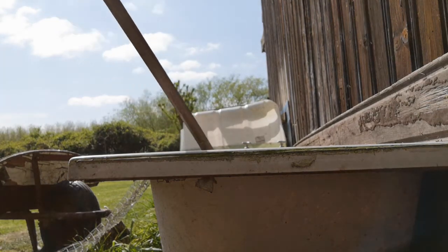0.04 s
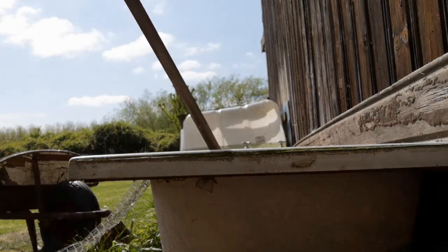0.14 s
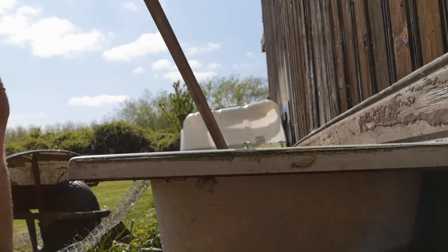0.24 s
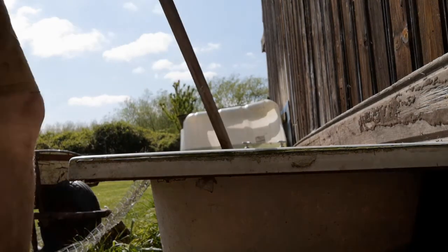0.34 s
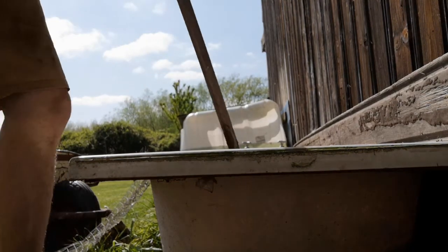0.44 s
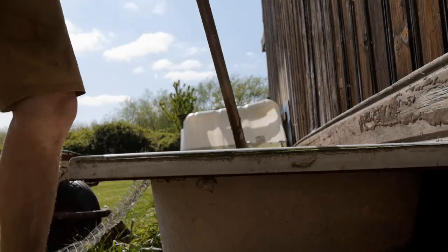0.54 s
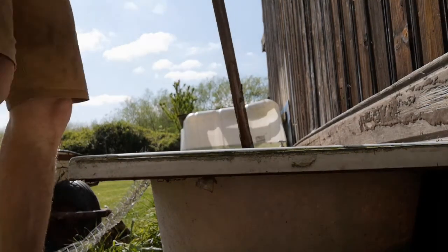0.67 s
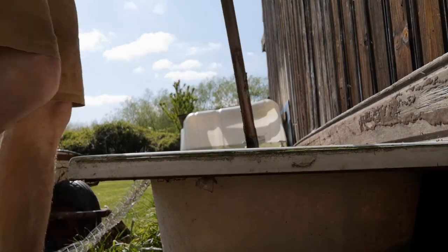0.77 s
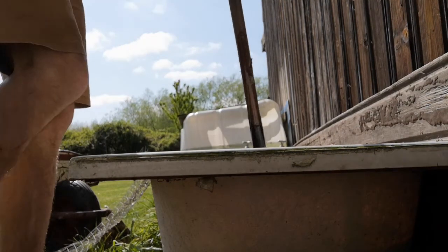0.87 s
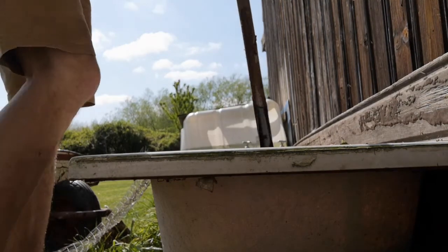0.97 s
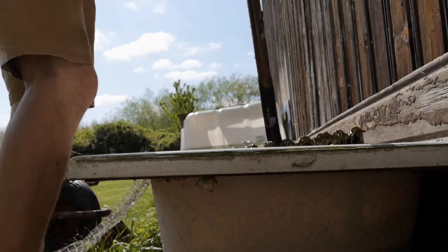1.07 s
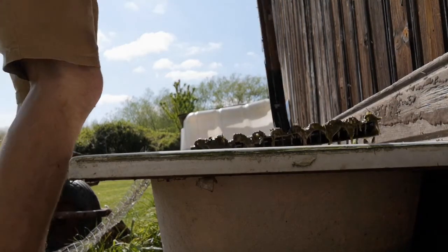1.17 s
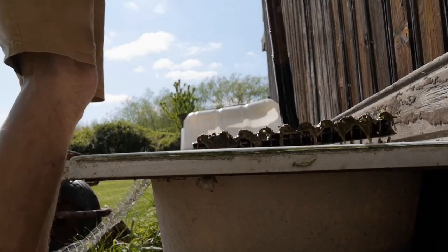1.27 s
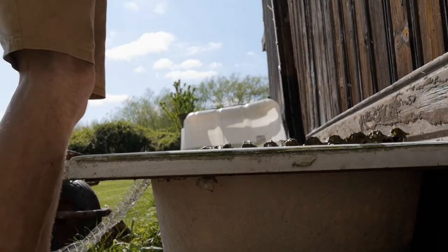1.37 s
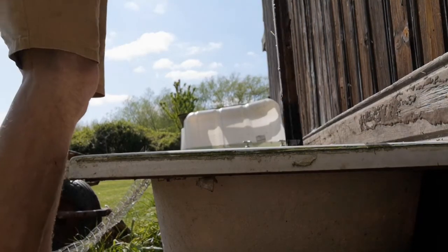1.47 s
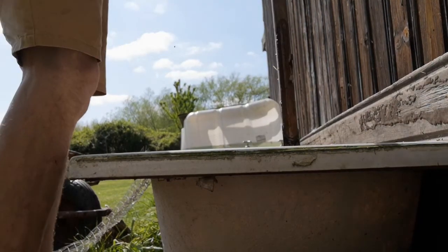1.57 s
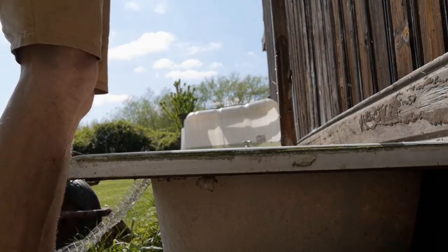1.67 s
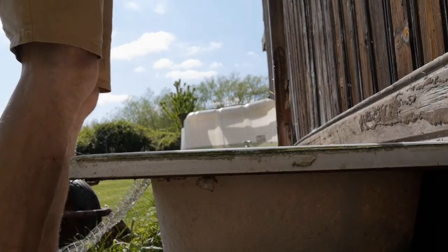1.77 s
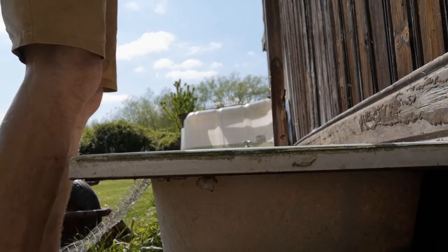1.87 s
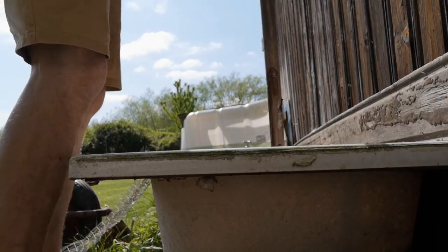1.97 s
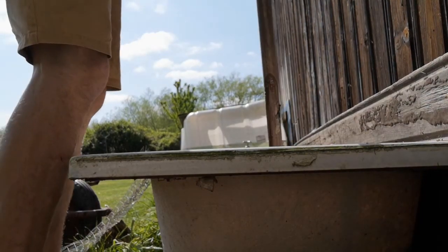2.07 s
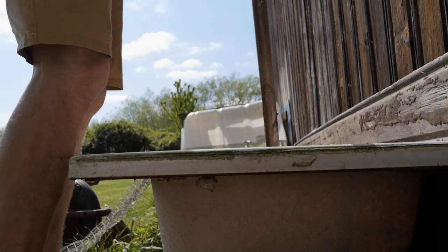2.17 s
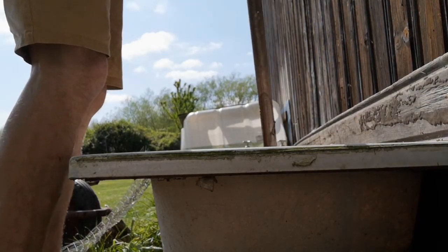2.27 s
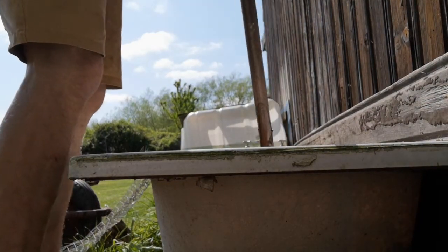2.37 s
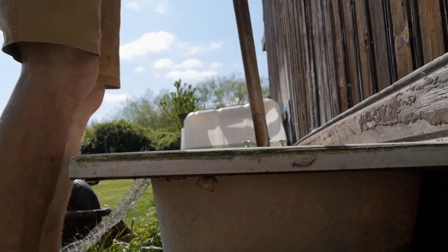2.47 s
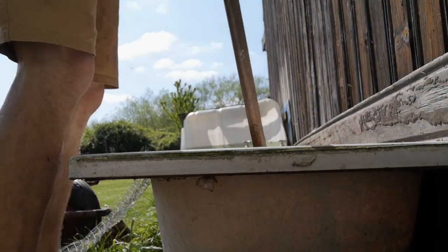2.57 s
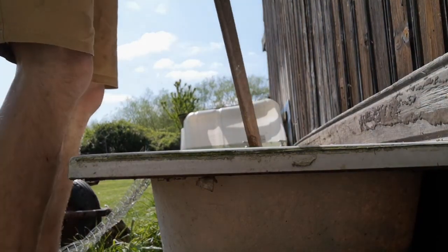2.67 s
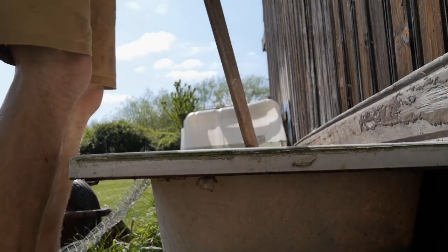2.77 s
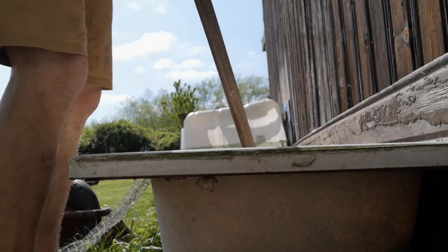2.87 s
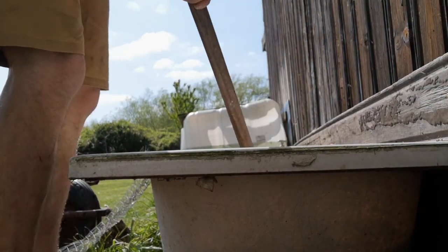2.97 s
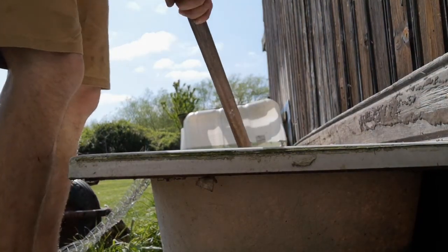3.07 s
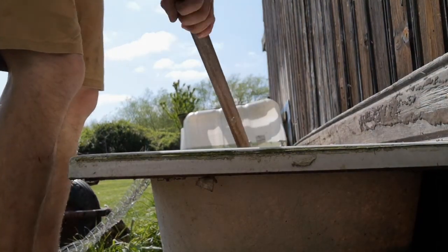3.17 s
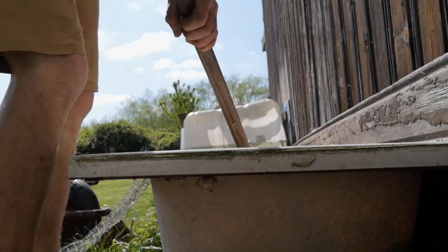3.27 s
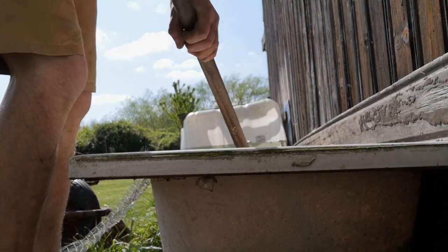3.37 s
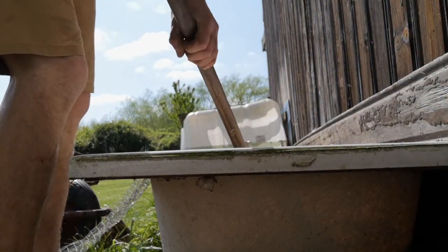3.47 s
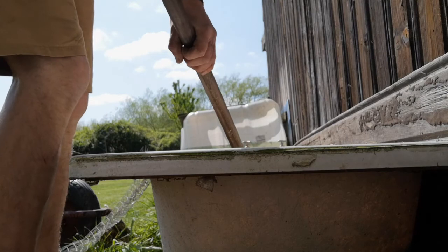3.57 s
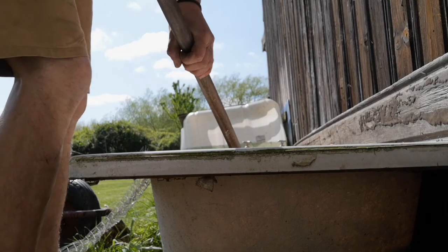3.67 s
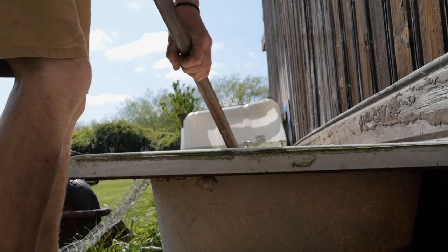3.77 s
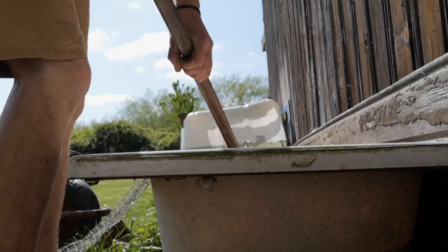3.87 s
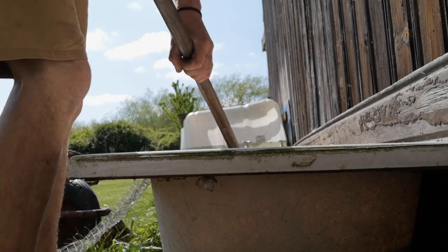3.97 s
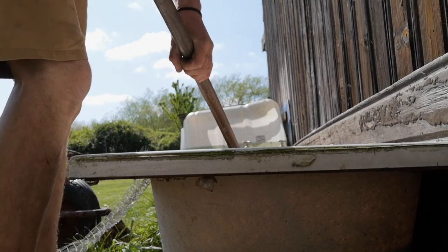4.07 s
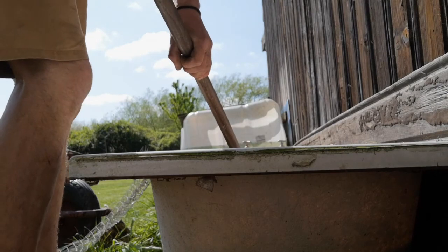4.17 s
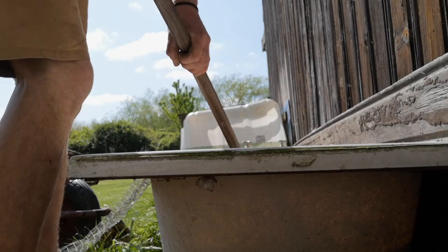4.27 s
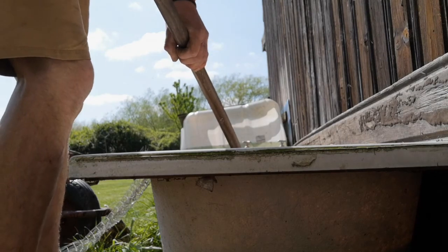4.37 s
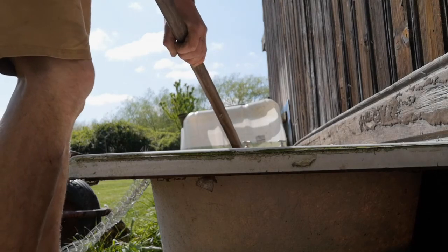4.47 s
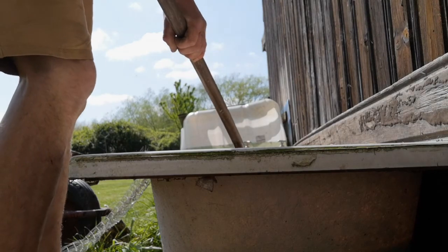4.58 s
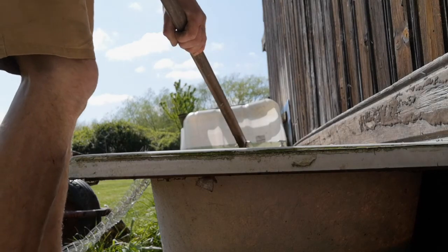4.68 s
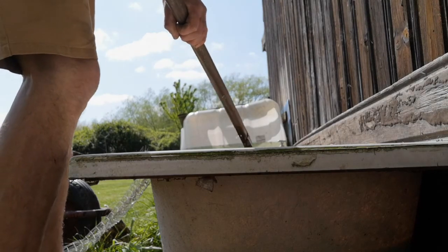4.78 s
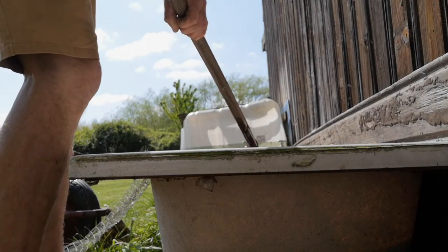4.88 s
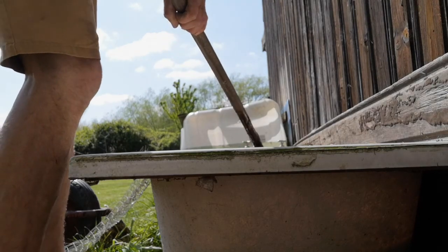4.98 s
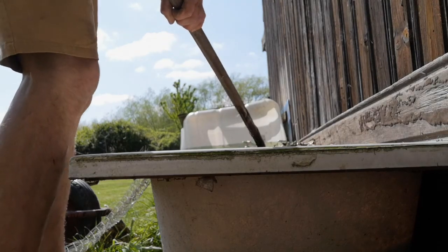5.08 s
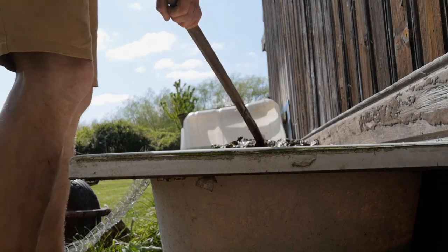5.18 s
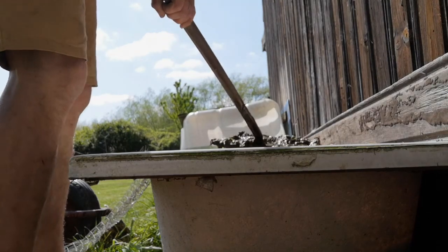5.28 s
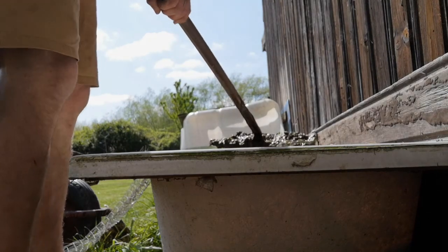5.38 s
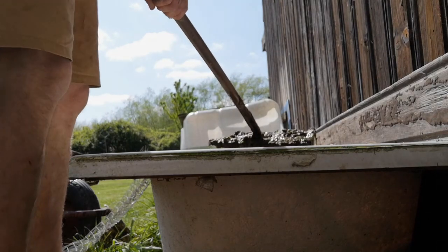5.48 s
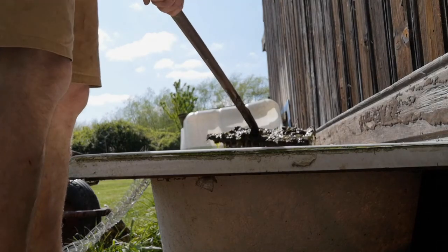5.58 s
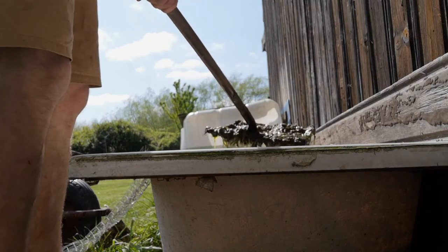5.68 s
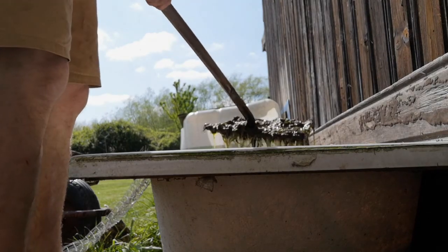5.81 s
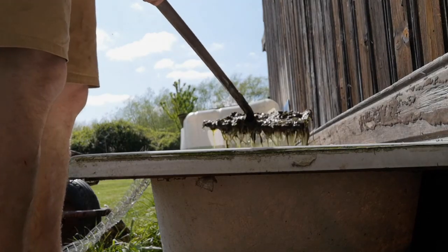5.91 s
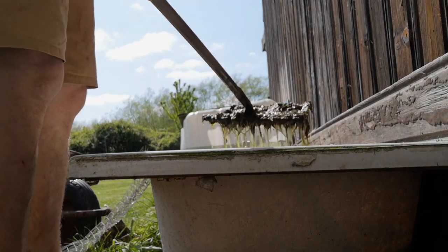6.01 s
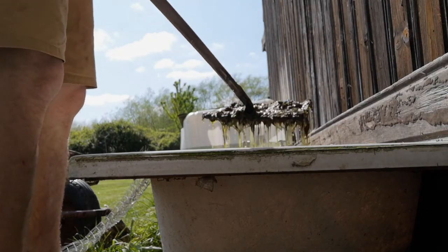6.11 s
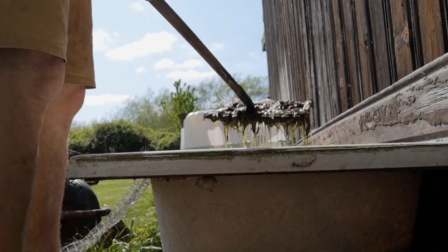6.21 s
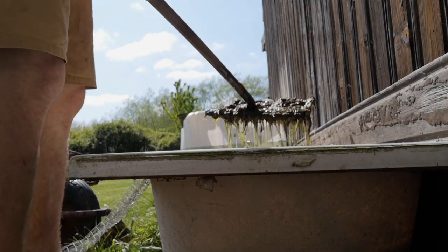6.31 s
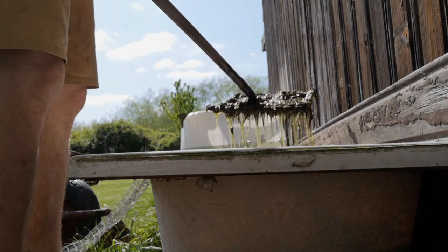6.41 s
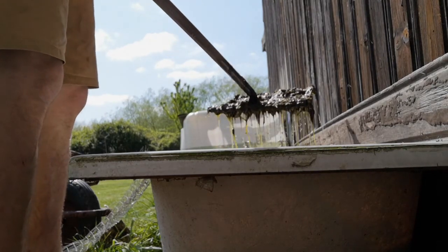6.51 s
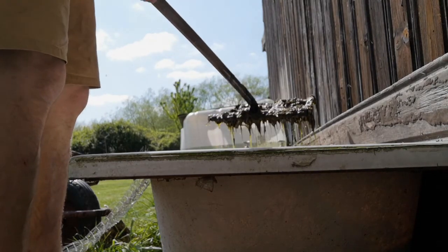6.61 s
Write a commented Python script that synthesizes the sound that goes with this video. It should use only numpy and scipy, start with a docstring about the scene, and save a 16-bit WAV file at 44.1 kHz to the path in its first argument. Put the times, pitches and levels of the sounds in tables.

```python
"""A rake is stirred through thick liquid in an old bathtub beside a barn, then lifted so that it streams back in:
filtered random impacts and rising sine bubbles follow the strokes, with single splashes and glugs on top.
The rake knocks on the tub wall (struck modes); dense noise tails give the echoes between the tub's sides.
Feet shift in the grass (crackle, low thud), birds sing further off (gliding sines),
and the open air rumbles softly (filtered noise)."""
import sys
import numpy as np
from scipy import signal
from scipy.fft import rfft, irfft
from scipy.io import wavfile
from scipy.ndimage import uniform_filter1d

SR = 44100
rng = np.random.default_rng(int(sys.argv[2]) if len(sys.argv) > 2 else 0)


def transcribe(u):
    """Save the signal u as a 16-bit wav file named by the first command-line argument.

    u: samples, shape (n,) or (channels, n), limited to [-1, 1]; the rate is SR.
    q: integer samples, one column per channel.
    """
    v = np.clip(np.atleast_2d(u).T, -1, 1)
    q = np.round(v * 32767).astype(np.int16)
    wavfile.write(sys.argv[1], SR, q)


N = 293265
T = np.arange(N) / SR

# pulls of the rake through the liquid: (time of full flow [s], hold [s], fall [dB/s],
# slosh level [dB], fine spray level [dB], rocking level [dB])
STROKES = [(0.707, 0.38, 49, -67, -69.5, -60), (1.058, 0.088, 126, -71, -59, -62),
           (1.606, 0.13, 24, -52, -57.5, -46.5), (2.397, 0.12, 104, -46, -52.5, -46),
           (3.898, 0.39, 100, -66, -76.5, -48.5), (5.132, 0.46, 76, -45.5, -44, -43),
           (5.588, 0.71, 31, -44, -46.5, -44), (6.561, .1, 90, -43, -48, -40)]
# larger splashes: (time [s], level [dB], length [s], centre [Hz])
SPLASHES = [(.745, -52, 0.023, 1290), (.925, -51.5, 0.037, 3600), (1.57, -37, 0.042, 1720),
            (1.62, -40.5, 0.075, 1880), (1.672, -26.5, 0.018, 1310), (1.692, -23.5, 0.014, 1620),
            (1.752, -31.5, 0.028, 1590), (1.938, -43.5, 0.027, 5240), (2.107, -37.5, 0.0059, 1640),
            (2.133, -34, 0.0064, 3540), (2.208, -41, 0.011, 1730), (2.23, -38, 0.012, 2250),
            (2.314, -32, 0.0051, 1400), (2.334, -37, 0.017, 1500), (2.387, -36.5, 0.049, 1450),
            (2.46, -33.5, 0.011, 3360), (2.5, -35.5, 0.022, 1400), (2.557, -36, 0.0068, 2330),
            (2.62, -44, 0.0035, 2600), (2.645, -51, 0.024, 1410), (2.7, -53, 0.015, 2480),
            (3.96, -49.5, 0.033, 2420), (4.753, -47, 0.01, 2320), (4.8, -53.5, 0.012, 7300),
            (5.055, -34, 0.0053, 2550), (5.715, -35, 0.067, 1140), (5.789, -22.5, 0.0051, 4540),
            (5.985, -34, 0.024, 2120), (6.083, -24, 0.006, 2940), (6.378, -29, 0.004, 2230),
            (6.488, -35, 0.0047, 1700)]
# single loud air pockets, low glugs to plinks under drops: (time [s], pitch [Hz], level [dB], t60 [s])
GLUGS = [(.695, 777, -57, 0.2), (0.728, 1080, -47.5, 0.14), (.755, 850, -42, 0.03),
         (0.764, 1195, -50, 0.12), (0.814, 1165, -49, 0.14), (0.839, 2740, -35.5, 0.036),
         (0.848, 1092, -41, 0.086), (.924, 3710, -35.5, 0.043), (1.032, 860, -46, .1),
         (1.077, 2750, -36, .03), (1.81, 748, -32.5, 0.066), (2.135, 3640, -28, 0.032),
         (2.285, 674, -31, 0.1), (2.441, 311, -29, 0.096), (2.463, 3520, -25, 0.018),
         (2.474, 305, -31, 0.078), (2.502, 282, -31, 0.057), (4.08, 1256, -40.5, .04),
         (4.304, 1790, -41, 0.062), (4.756, 3200, -43, 0.037), (5.06, 633, -34, .09),
         (5.07, 1080, -35, 0.075), (5.163, 2120, -29.5, 0.032), (5.185, 764, -26.5, 0.065),
         (5.197, 3720, -23, 0.019), (5.222, 715, -28, 0.088), (5.243, 3900, -21, .02),
         (5.267, 441, -27.5, 0.083), (5.289, 3630, -22.5, 0.048), (5.361, 4970, -26, .015),
         (5.383, 1020, -32, 0.052), (5.44, 1167, -29, 0.048), (5.55, 415, -37.5, .2),
         (5.583, 3570, -25, 0.028), (5.612, 410.5, -25.5, 0.2), (5.658, 2120, -30, 0.022),
         (5.742, 932, -31.5, 0.059), (5.752, 413, -30, 0.13), (5.79, 1128, -28, 0.052),
         (5.984, 2200, -25, 0.025), (6.11, 418, -35, 0.18), (6.144, 1770, -25, 0.041),
         (6.189, 3780, -19, 0.041), (6.294, 2600, -31, 0.045), (6.425, 3800, -24.5, 0.028),
         (6.491, 1730, -26, 0.052), (6.589, 2100, -29, 0.037)]
# rake against the tub: (time [s], delay until the head settles [s], wall boom [dB],
# hardness as tilt of the upper boom [dB/octave], clack [dB], tick of the tines [dB])
KNOCKS = [(1.127, 0.0032, -45, -28, -68, -62), (1.156, 0.0039, -57, -17, -48, -63),
          (1.447, 0.0032, -27.5, 4, -11, -29), (1.491, .003, -29.5, -1.5, -21, -28),
          (1.684, .014, -40, -0.5, -22, -33.5), (3.858, .013, -48, 8.5, -26.5, -46),
          (4.944, 0.014, -31.5, -17, -14.5, -39), (5.077, 0.01, -54.5, -22, -49, -58)]
# modes of the tub's wall: (frequency [Hz], relative level [dB], t60 [s])
WALL_MODES = [(56.6, -9, 0.94), (90, -10.5, 1), (108.7, 6, 0.31), (153.8, -0.5, 0.41), (184, 4, 0.21),
              (192, 9.5, 0.24), (223, 4, 0.19), (264.6, -0.5, 0.051), (298, -3, 0.21), (320, -21, 0.2),
              (340.5, -8.5, 0.15), (414, -9, 0.14)]
# modes of the rake's head and handle: (frequency [Hz], relative level [dB], t60 [s])
RAKE_MODES = [(653, 1.5, 0.0076), (870, 5.5, 0.0092), (962, 5, 0.016), (1100, 3, 0.0092),
              (1345, -4.5, 0.011), (1650, -1, 0.0076), (2060, -8, 0.011), (2650, -10.5, 0.012)]
# soles pressing into grass: (middle [s], length [s], rustle [dB], thud [dB])
STEPS = [(-0.01, 0.1, -46.5, -49.5), (0.18, 0.11, -54, -49), (0.396, 0.17, -64, -86),
         (1.039, 0.093, -49.5, -65), (1.159, 0.046, -40.5, -39.5), (2.419, 0.024, -40, -45),
         (3.383, 0.23, -68.5, -92)]
# low fluting birds, one smooth arc a note:
# (time [s], length [s], start pitch [Hz], middle pitch [Hz], end pitch [Hz], level [dB])
FLUTES = [(1.924, 0.13, 2270, 2320, 2240, -55), (2.934, 0.22, 1774, 1873, 1680, -53),
          (3.131, 0.14, 1660, 1558, 1886, -51.5), (3.541, .115, 2000, 2500, 2360, -51.5),
          (3.654, 0.147, 2260, 1985, 1930, -48), (3.653, 0.17, 2580, 2735, 3100, -56.5),
          (3.994, 0.094, 2600, 3130, 2720, -60.5), (4.026, 0.066, 1480, 1540, 1300, -53),
          (4.128, 0.032, 2700, 2720, 2580, -48), (4.19, 0.17, 2084, 2134, 2135, -53.5),
          (4.273, 0.076, 2150, 2180, 2055, -43.5), (4.388, 0.047, 2320, 2344, 2300, -46),
          (4.435, 0.071, 2170, 2230, 2290, -51.5), (4.525, .2, 1780, 1830, 1800, -52),
          (4.634, 0.093, 1350, 1420, 1280, -54.5), (4.787, 0.11, 2407, 2480, 2815, -40),
          (4.88, 0.12, 2780, 2864, 2700, -44.5)]
# a small bird's upward chirps, and at 0.918 s a brief rising ping amid the splashing: (time [s], length [s],
# end pitch [Hz], level [dB])
CHIRPS = [(0.081, 0.025, 4530, -44.5), (0.458, 0.044, 4170, -50), (0.918, 0.017, 4210, -47),
          (1.811, 0.027, 5180, -46), (1.98, 0.032, 4900, -65), (2.16, 0.027, 4140, -43.5),
          (2.752, 0.027, 4260, -53.5), (2.957, 0.024, 4320, -47.5), (3.343, 0.014, 4630, -56.5),
          (3.79, .07, 4370, -48), (4.206, 0.014, 4180, -48), (4.544, 0.019, 4840, -56.5),
          (4.656, 0.023, 3900, -54.5)]
# its thin whistles, arcs too:
# (time [s], length [s], start pitch [Hz], middle pitch [Hz], end pitch [Hz], level [dB])
WHISTLES = [(.068, 0.065, 5870, 6060, 6000, -51), (3.06, 0.077, 4300, 4030, 3500, -63),
            (3.122, 0.1, 4930, 4460, 4280, -68), (3.142, 0.11, 7760, 7300, 6830, -68),
            (3.35, 0.044, 4850, 4950, 4630, -51), (3.427, 0.031, 5630, 6080, 5700, -47.5),
            (4.423, 0.022, 5600, 5650, 5640, -63), (4.552, 0.016, 5280, 5700, 5800, -53),
            (4.631, 0.0097, 6670, 6370, 5300, -49), (4.837, 0.026, 3390, 3670, 3570, -43)]
# its runs of two-step falling syllables: (time [s], syllables [count], level [dB])
TRILLS = [(2.855, 1, -56.5), (3.448, 4, -55), (4.025, 1, -54.5)]
# steps of a syllable: (time into the syllable [s], length [s], end pitch [Hz], relative level [dB])
SYLLABLE = [(0, 0.031, 5500, -5), (.034, 0.02, 3450, 0)]
# spectrum of the slosh: (frequency [Hz], relative level [dB])
LIQUID_SPECTRUM = [(150, -35), (300, -0.5), (420, -0.5), (550, -2.5), (800, 1), (1080, 5.5), (1400, -0.5),
                   (1950, 2.5), (2400, 1), (3000, -14.5), (3750, 5.5), (4600, -17.5), (6500, -18),
                   (12000, -40)]
# spectrum of the fine spray: (frequency [Hz], relative level [dB])
SPRAY_SPECTRUM = [(1000, -2), (2500, 4.5), (3800, 4), (4600, 3.5), (6200, -2.5), (7900, 4.5), (9300, 1.5),
                  (10500, -9), (12500, -14.5), (15000, -28.5)]
# hollow of the tub, as splashes ring it: (frequency [Hz], relative level [dB])
HOLLOW_SPECTRUM = [(650, 3), (1050, 9.5), (1350, 3), (1750, 5), (2700, -1), (3700, 8.5), (4500, -5.5),
                   (8300, 11.5), (12000, 4)]
# spectrum of the tines' tick: (frequency [Hz], relative level [dB])
TICK_SPECTRUM = [(500, -27), (2000, -22), (3800, -3.5), (6000, -8.5), (8500, -8), (11000, -22.5),
                 (15000, -48)]
# direction of the tub: (frequency [Hz], left minus right [dB])
TUB_PAN = [(150, -1), (600, -5), (1150, 2.5), (2000, -1), (2700, -6.5), (5000, -4.5), (8000, -5),
           (10500, 1.5)]
# spectrum of the grass rustle: (frequency [Hz], relative level [dB])
GRASS_SPECTRUM = [(200, -14), (1000, -9), (2000, -6), (4000, -10.5), (6500, -7.5), (9000, 0.5),
                  (11000, -16), (15000, -22)]
# spectrum of a sole's thud: (frequency [Hz], relative level [dB])
THUD_SPECTRUM = [(30, -1), (80, 6), (130, 0.5), (250, -5.5), (500, -21), (1500, -48)]
# spectrum of the outdoor hush: (frequency [Hz], relative level [dB])
AIR_SPECTRUM = [(12, -23), (20, 7.5), (74, 3), (194, -7.5), (242, -16), (774, -30), (914, -33),
                (1020, -49.5), (1830, -18), (2280, -29.5), (2620, -21.5), (4310, -48), (5240, -31),
                (5850, -37), (10000, -38.5), (12000, -49), (15000, -48)]
# spectrum of the rocking tub: (frequency [Hz], relative level [dB])
ROCKING_SPECTRUM = [(18, -6), (35, -7), (56, 4.5), (75, -10.5), (112, -3.5), (145, -16.5), (180, -8),
                    (260, -31.5), (600, -59.5)]

# floors while the head glides under the surface
CALM_SLOSH_DB, CALM_SPRAY_DB, CALM_ROCK_DB = -74, -82.5, -56
FLOW_RISE_DB_PER_S = 79.5
ROCK_RISE_DB_PER_S, ROCK_FALL_DB_PER_S = 15.5, 20.5
DROP_SHARE, BUBBLE_SHARE = 0.62, 0.39  # amplitude weights in the slosh
GLUG_RISE = 0.017  # share by which a pocket's pitch climbs over its t60
FIRST_BOOM_DB, SETTLE_CLACK_DB, SETTLE_TICK_DB = -4.5, -24, -5.5  # weaker contact against stronger
TILT_PIVOT_HZ = 220
LEFT_LAG_SAMPLES = 41
CHIRP_RISE_OCT, CHIRP_BEND = 0.37, 1.3
TRILL_PERIOD_S, TRILL_FALL_OCT, TRILL_BEND = 0.095, 0.49, 2.04
AIR_DB = -52.5
TOP_HZ = 15400


def trickle(slosh_gain, spray_gain):
    """At one spot along the tines, drops strike and trap bubbles; strong flow throws fine spray."""
    drops = crackle(rate_hz=260, spread_db=6)
    plinks = bubbling(637.3, 4394, cycles=47.0, count=1200)
    fizz = bubbling(2590, 10040, cycles=10.0, count=1200)
    spurts = undb(1.2 * walk(55))
    slosh = colour(spurts * (DROP_SHARE * drops + BUBBLE_SHARE * plinks), LIQUID_SPECTRUM)
    spray = colour(spurts * (0.6 * drops + 0.8 * fizz), SPRAY_SPECTRUM)
    return slosh_gain * unit(slosh) + spray_gain * unit(spray)


def flow(column, calm_db, rise_db_per_s, fall_db_per_s=None):
    """Stroke gain: each swells, holds and dies away, at its own rate unless one is given."""
    index = ("slosh", "spray", "rocking").index(column)
    power = undb(calm_db) ** 2
    for s, hold_s, own_fall, *levels_db in STROKES:
        rise_db = rise_db_per_s * np.maximum(s - T, 0)
        fall_db = (fall_db_per_s or own_fall) * np.maximum(T - s - hold_s, 0)
        power = np.maximum(power, undb(levels_db[index] - rise_db - fall_db) ** 2)
    return np.sqrt(power)


def bubbling(lo_hz, hi_hz, cycles, count):
    """Many small bubbles of all sizes, most faint and a few loud."""
    out = np.zeros(N)
    for when, pitch, size, life in rng.random((count, 4)):
        hz = lo_hz * (hi_hz / lo_hz) ** pitch
        t60_s = cycles * (0.5 + life) / hz
        gain = np.sqrt(hz) * undb(15 * size ** 3)
        add(out, when * N / SR, gain * bubble(hz, t60_s, rise=0.083))
    return unit(out)


def bubble(hz, t60_s, rise):
    """A ringing air pocket whose pitch climbs as it nears the surface."""
    t = np.arange(int(t60_s * SR)) / SR
    tone = np.sin(2 * np.pi * hz * t * (1 + rise * t / t60_s / 2))
    return tone * decay(t, t60_s) * (1 - np.exp(-t * hz))


def splashes(count):
    """Lumps of liquid fall on the spots in turn: short, dense impact bursts ring the tub's hollow."""
    out = np.zeros((count, N))
    for k, (s, db, length_s, hz) in enumerate(SPLASHES):
        t = np.arange(int(4 * length_s * SR)) / SR
        grains = crackle(rate_hz=4400, spread_db=6.5)[:len(t)]
        slap = unit(band(grains, hz / 1.96, hz * 1.24))
        broad = undb(-4.5) * unit(band(grains, 680, 3470))
        swell = (1 - np.exp(-t / (0.08 * length_s))) * np.exp(-(t / length_s) ** 2)
        add(out[k % count], s, undb(db) * swell * (slap + broad))
    return colour(out, HOLLOW_SPECTRUM)


def glugs():
    """Single air pockets close behind the tines, and those that falling drops trap."""
    out = np.zeros(N)
    for s, hz, db, t60_s in GLUGS:
        add(out, s, undb(db) * bubble(hz, t60_s, rise=GLUG_RISE))
    return out


def knocks():
    """Tines tick and head clacks, then the weight settles and the wall booms: (contact, boom)."""
    boom, clack, tick = np.zeros((3, N))
    t = np.arange(SR) / SR
    for s, settle_s, boom_db, tilt_db, clack_db, tick_db in KNOCKS:
        first = (s, boom_db + FIRST_BOOM_DB, clack_db, tick_db)
        settled = (s + settle_s, boom_db, clack_db + SETTLE_CLACK_DB, tick_db + SETTLE_TICK_DB)
        for at_s, wall_db, head_db, tines_db in (first, settled):
            add(boom, at_s, undb(wall_db) * ring(WALL_MODES, t, tilt_db))
            add(clack, at_s, undb(head_db) * ring(RAKE_MODES, t))
            add(tick, at_s, undb(tines_db) * rng.standard_normal(len(t)) * np.exp(-t / 0.0035))
    return clack + colour(tick, TICK_SPECTRUM), boom


def ring(modes, t, tilt_db=0):
    """Struck modes, weighted anew by each blow's spot; a soft blow favours the low ones."""
    out = np.zeros(len(t))
    for k, (hz, db, t60_s) in enumerate(modes):
        octaves = max(np.log2(hz / TILT_PIVOT_HZ), 0)
        gain = undb(db + tilt_db * octaves + 1.4 * rng.standard_normal())
        out += gain * (-1) ** k * np.sin(2 * np.pi * hz * t) * decay(t, t60_s)
    return out


def from_tub(spots, pockets, contact):
    """Each spot's sound bounces its own way between the tub's sides and leaves over the rim."""
    wet = sum(echoes(spot, t60_s=0.07, wet_db=2) for spot in spots)
    wet = wet + echoes(pockets, t60_s=0.07, wet_db=-10)
    wet = wet + echoes(contact, t60_s=0.08, wet_db=3.0)
    hz, db = np.transpose(TUB_PAN)
    pan_db = np.interp(np.log(np.arange(N // 2 + 1) * SR / N + 1), np.log(hz), db)
    return irfft(rfft(wet) * undb(np.array([pan_db, -pan_db]) / 2), N)


def off_barn(boom):
    """The boards of the barn throw the boom back, to each channel by another path."""
    back = band(boom, 322, 700)
    paths = np.array([np.interp(T - lag_s, T, back) for lag_s in (0.0093, 0.0135)])
    return boom + undb(3.5) * paths


def steps():
    """Grass blades crackle under a sole as the weight comes down with a low thud."""
    rustle, thud = np.zeros((2, N))
    for s, length_s, rustle_db, thud_db in STEPS:
        press = np.exp(-2 * ((T - s) / length_s) ** 2)
        rustle += undb(rustle_db) * press
        thud += undb(thud_db) * press
    blades = np.array([crackle(rate_hz=8000, spread_db=7.0) for channel in range(2)])
    grass = colour(rustle * blades * undb(2 * walk(70)), GRASS_SPECTRUM)
    return grass + colour(thud * rng.standard_normal(N), THUD_SPECTRUM)


def birds():
    """Gliding whistles that waver in pitch and strength, scattered by barn and hedges."""
    out, waver, flutter = np.zeros(N), walk(300), undb(1.8 * walk(90))
    for s, length_s, contour_hz, db in song():
        u = np.linspace(0, 1, int(length_s * SR))
        glide_hz = np.interp(u, np.linspace(0, 1, len(contour_hz)), contour_hz)
        hz = glide_hz * (1 + 0.014 * waver[int(s * SR):][:len(u)])
        swell = np.sqrt(abs(np.sin(np.pi * u)))
        add(out, s, undb(db) * swell * np.sin(2 * np.pi * np.cumsum(hz) / SR))
    return echoes(out * flutter, t60_s=0.26, wet_db=-0.5)


def song():
    """Every bird note as (time [s], length [s], pitch contour [Hz], level [dB])."""
    u = np.linspace(0, 1, 64)
    for s, length_s, start, middle, end, db in FLUTES + WHISTLES:
        arc = np.polyfit([0, 0.5, 1], [start, middle, end], 2)
        yield s, length_s, np.polyval(arc, u), db
    for s, length_s, hz, db in CHIRPS:
        yield s, length_s, hz * 2 ** (-CHIRP_RISE_OCT * (1 - u) ** CHIRP_BEND), db
    fall = 2 ** (TRILL_FALL_OCT * (1 - u) ** TRILL_BEND)
    for s, count, db in TRILLS:
        for k in range(round(count)):
            for delay_s, length_s, hz, step_db in SYLLABLE:
                yield s + k * TRILL_PERIOD_S + delay_s, length_s, hz * fall, db + step_db


def open_air():
    """Outdoor hush, alike in both channels in the bass, and the filled tub's low rocking with the strokes."""
    common, own = rng.standard_normal(N), rng.standard_normal((2, N))
    mixed = common - band(common, 220, 22000) + band(own, 252, 16000)
    hush = unit(colour(mixed, AIR_SPECTRUM)) * undb(AIR_DB + 0.91 * walk(12.0))
    rocking = unit(colour(rng.standard_normal(N), ROCKING_SPECTRUM))
    return hush + rocking * flow("rocking", CALM_ROCK_DB, ROCK_RISE_DB_PER_S, ROCK_FALL_DB_PER_S)


def echoes(x, t60_s, wet_db):
    """Direct sound, right channel first, and a dense reflection tail that differs in each channel."""
    t = np.arange(SR // 2) / SR
    spectrum = rfft(rng.standard_normal((2, len(t))) * decay(t, t60_s))
    smooth_power = uniform_filter1d(abs(spectrum) ** 2, size=100)
    response = undb(wet_db) * irfft(spectrum / np.sqrt(smooth_power))  # levelled spectrum
    half = len(t) // 2
    response[:, half:] *= np.linspace(1, 0, len(t) - half) ** 2
    response[1, 0] += 1
    response[0, LEFT_LAG_SAMPLES] += 1
    return signal.oaconvolve(np.atleast_2d(x), response / np.hypot(1, undb(wet_db)), axes=1)[:, :N]


def crackle(rate_hz, spread_db):
    """Tiny impacts at random moments, of very unequal size, scaled to rms 1."""
    hits = rng.random(N) < rate_hz / SR
    size = undb(spread_db * np.clip(rng.standard_normal(N), -2, 2))
    return unit(hits * rng.choice([-1, 1], N) * size)


def walk(rate_hz):
    """Slow random wander, rms 1: held draws smoothed over one hold."""
    k = int(SR / rate_hz)
    held = np.repeat(rng.standard_normal(N // k + 1), k)
    return unit(uniform_filter1d(held, k)[:N])


def colour(x, points):
    """Causal minimum-phase filter of unit energy through (frequency [Hz], level [dB]) points."""
    size = 4096
    hz, db = np.transpose(points)
    bins_hz = np.arange(size // 2 + 1) * SR / size
    log_gain = np.log(undb(np.interp(np.log(bins_hz + 1), np.log(hz), db)))
    cepstrum = irfft(log_gain)
    cepstrum[1:size // 2] *= 2  # fold onto positive time
    cepstrum[size // 2 + 1:] = 0
    response = irfft(np.exp(rfft(cepstrum)))
    response /= np.sqrt(np.sum(response ** 2))
    return signal.oaconvolve(np.atleast_2d(x), response[None], axes=1)[:, :N]


def band(x, lo_hz, hi_hz):
    """Gentle band-pass."""
    sos = signal.butter(2, [lo_hz, min(hi_hz, SR / 2.2)], "band", fs=SR, output="sos")
    return signal.sosfilt(sos, x)


def decay(t, t60_s):
    """Exponential decay by 60 dB in t60_s."""
    return np.exp(-np.log(1000) * t / t60_s)


def undb(db):
    """Decibels to gain."""
    return 10 ** (np.asarray(db) / 20)


def unit(x):
    """Scale to rms 1."""
    return x / np.sqrt(np.mean(x ** 2) + 1e-18)


def add(track, s, sound):
    """Mix a sound in from time s [s] on."""
    i = max(int(s * SR), 0)
    part = sound[..., :max(N - i, 0)]
    track[..., i:i + part.shape[-1]] += part


def scene():
    """Sum of all sources in two channels, left and right."""
    slosh_gain = flow("slosh", CALM_SLOSH_DB, FLOW_RISE_DB_PER_S)
    spray_gain = flow("spray", CALM_SPRAY_DB, FLOW_RISE_DB_PER_S)
    spots = [trickle(slosh_gain, spray_gain) + lumps for lumps in splashes(count=4)]
    contact, boom = knocks()
    return from_tub(spots, glugs(), contact) + off_barn(boom) + steps() + birds() + open_air()


def record(dry):
    """Steep low-pass at TOP_HZ."""
    return signal.sosfilt(signal.ellip(8, 0.2, 70, TOP_HZ, fs=SR, output="sos"), dry)


dry = scene()
out = record(dry)
transcribe(out)
```